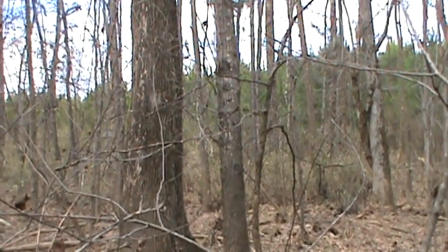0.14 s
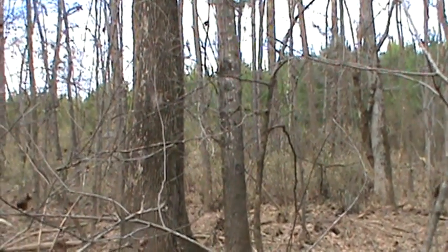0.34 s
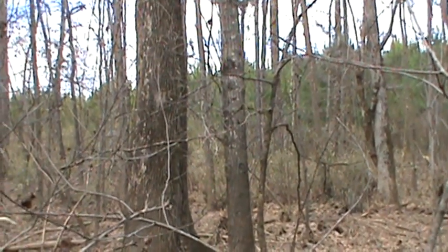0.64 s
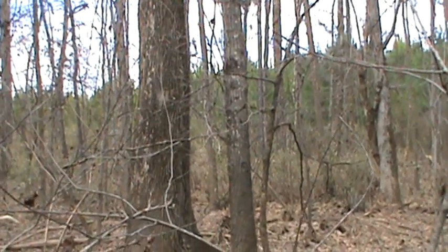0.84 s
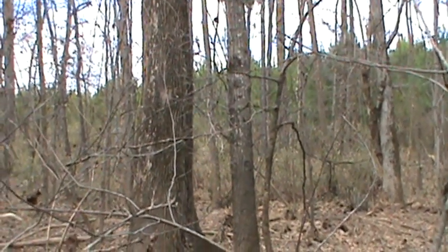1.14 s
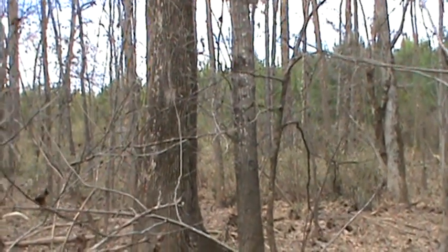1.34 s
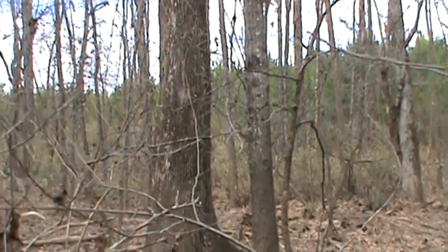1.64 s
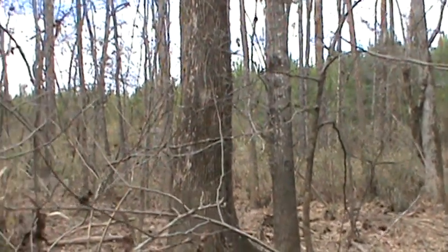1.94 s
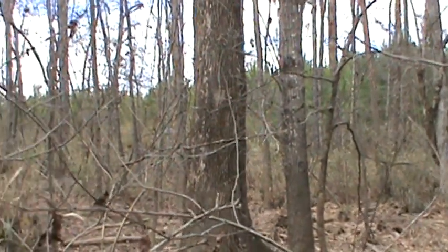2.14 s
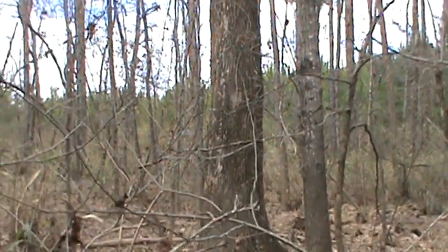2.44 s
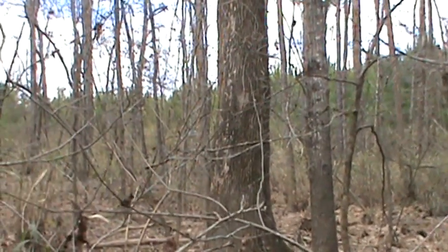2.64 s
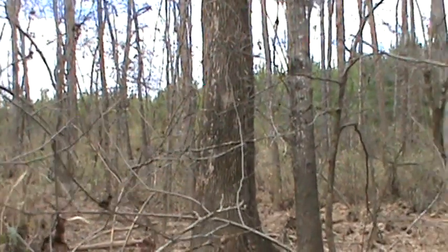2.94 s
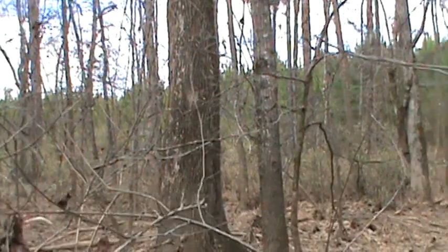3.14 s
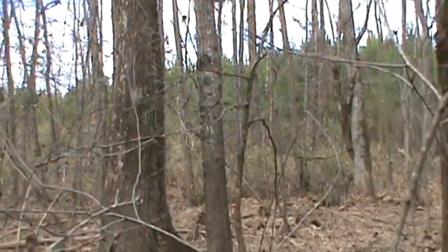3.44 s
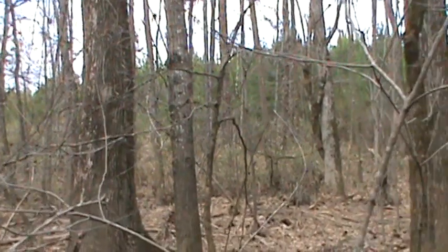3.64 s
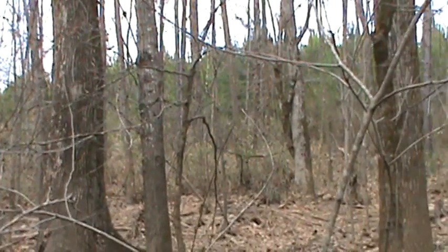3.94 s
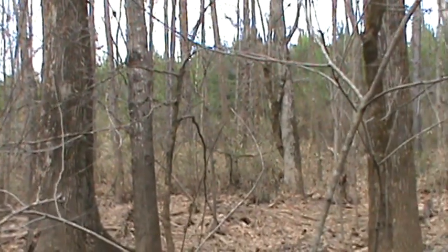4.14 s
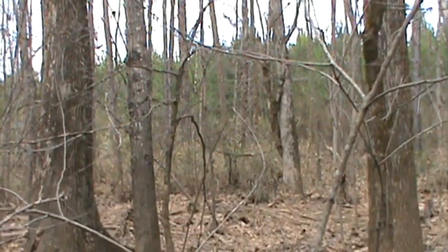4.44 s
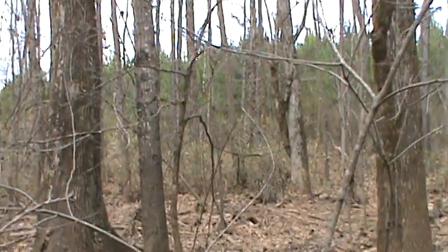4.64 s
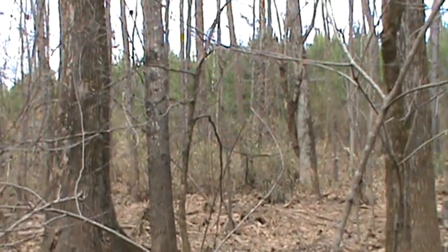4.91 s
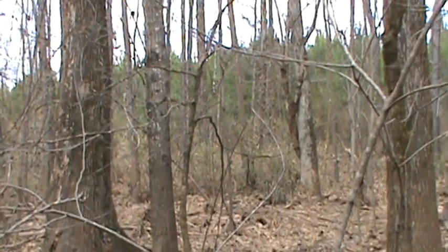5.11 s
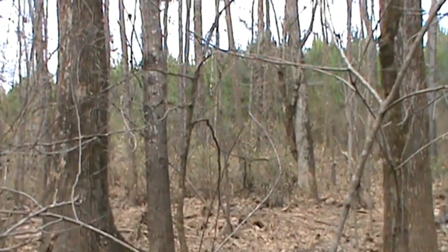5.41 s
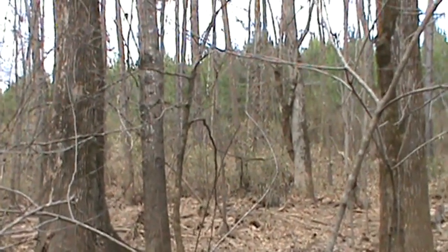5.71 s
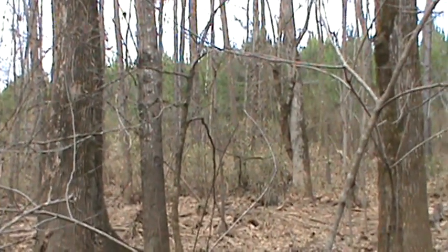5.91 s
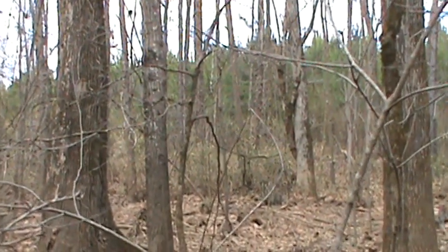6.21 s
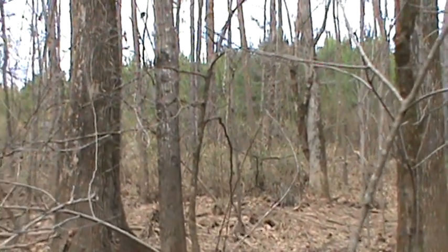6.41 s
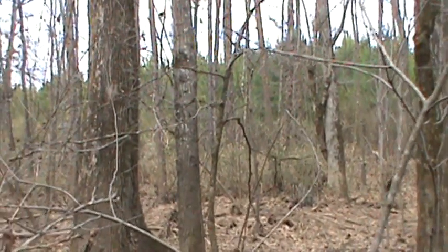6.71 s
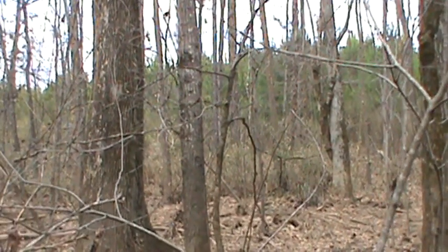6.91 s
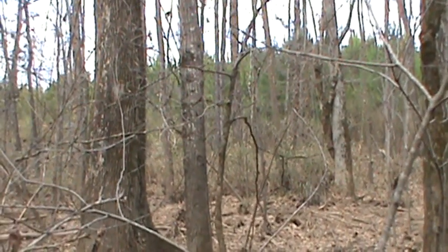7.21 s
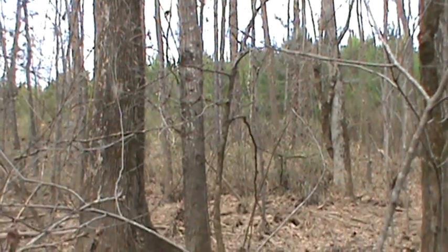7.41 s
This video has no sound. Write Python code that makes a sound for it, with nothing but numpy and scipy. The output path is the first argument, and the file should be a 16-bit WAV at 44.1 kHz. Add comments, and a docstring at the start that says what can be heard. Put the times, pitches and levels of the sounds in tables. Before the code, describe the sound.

Distant hounds yelp and bay together, thick at first and then sparser, ringing through open woods with rare thin bird chips and tiny handling ticks.

```python
"""You hear a pack of hounds baying some way off in bare woodland, thin bird chips, hiss, hum and ticks.
Each bay is a stack of tones on a pitch that scoops up, with a rasp of air; the trunks scatter it into a long tail.
The bird's chips are short gliding tones. Filtered noise makes the hiss and rumble of air and electronics.
The hand-held camcorder adds a wavering motor hum, thin whines and its line whistle, all from sine waves,
and a few ticks from the hand, made of tiny noise bursts."""
import sys
import numpy as np
from scipy import signal
from scipy.fft import rfft, irfft
from scipy.io import wavfile
from scipy.ndimage import uniform_filter1d

SR = 44100
rng = np.random.default_rng(int(sys.argv[2]) if len(sys.argv) > 2 else 0)


def store_wav(level_fs):
    """Save 16-bit WAV to argv[1]."""
    pcm = np.round(np.clip(np.atleast_2d(level_fs), -1, 1) * 32767)
    wavfile.write(sys.argv[1], SR, pcm.T.astype(np.int16))


N = 333396

# The cries of the pack. Each row: start in seconds, scoop in seconds, hold in seconds, top pitch in Hz,
# end pitch in Hz, then levels in dB of the first, second, third and fourth partial and of the treble partials,
# roughness from 0 to 1, and how far the hound faces the microphone in dB (for the straight sound only).
CRIES = [(-.3, 0.039, 0.068, 652.7, 654, -21, -39, -36, -50, -85, 0.38, 0),
         (-.12, .045, 0.098, 545.6, 533, -54, -41, -40, -48, -85, 0.49, -4),
         (0, 0.015, 0.1026, 694, 613.4, -29.5, -41.5, -58, -59, -68, 0.26, -4),
         (.2, 0.036, .15, 714.5, 679, -34, -39.5, -47, -50, -82, 0.19, -5.5),
         (.28, .02, .1, 659.6, 663, -34.5, -34.5, -40, -44, -72, 0.17, -4.5),
         (.36, 0.0267, 0.083, 465, 407, -61, -47.5, -33, -46, -71, 0.26, -8),
         (.45, .05, 0.062, 678, 710.6, -33.5, -41, -44, -68, -71, 0.18, -5),
         (.58, .013, 0.17, 644.3, 690, -36.5, -42, -46.5, -45, -74.5, 0.24, -9.5),
         (.68, 0.0637, 0.072, 647, 641.3, -26, -36, -39, -44, -69, 0.2, -3),
         (.75, 0.0091, 0.12, 633.1, 640, -29, -35.5, -48.5, -50, -74, 0.16, -9.5),
         (.78, 0.039, 0.022, 479, 478, -50.5, -31.5, -58, -47, -71, 0.11, -3.5),
         (.97, 0.046, .06, 611, 628, -33, -34, -42.5, -44.5, -73, 0.12, -3),
         (1.03, 0.034, 0.069, 691, 710, -33, -42, -53, -52, -68.5, 0.28, -12),
         (1.17, .048, 0.031, 682.2, 715, -31.5, -60, -56, -70, -88, 0.3, -1),
         (1.3, 0.043, 0.041, 530, 534, -44.5, -38, -46, -54, -85, 0.13, -4.5),
         (1.36, .015, 0.034, 467, 424, -58, -40.5, -48, -66, -87, 0.1, -3),
         (1.38, 0.0387, 0.08, 646, 600, -31, -36, -52, -47, -83, 0, -5),
         (1.43, 0.044, 0.03, 609.3, 614, -35.5, -37, -41.5, -48, -74, 0.21, -0.9),
         (1.48, 0.03185, 0.043, 699, 704, -38.5, -43, -48, -62, -76, 0.16, -1),
         (1.57, 0.034, 0.083, 626, 623, -36, -37.5, -40.5, -42.5, -72.5, .12, -4),
         (1.63, 0.037, 0.027, 707.5, 746, -34, -57, -65, -69.5, -84, 0.09, 0),
         (1.77, 0.016, 0.12, 629.4, 619, -34.5, -42.5, -52, -51, -80, .11, -3.5),
         (1.86, 0.042, 0.0498, 555, 543.8, -48, -41, -45, -49, -81, 0.12, -0.5),
         (1.91, 0.011, 0.14, 621.2, 622, -35.5, -64.5, -64, -71, -87, 0.23, .6),
         (1.95, .035, 0.055, 472, 470, -66, -42.5, -58, -59, -87.5, 0.28, -1.5),
         (2.0, 0.018, 0.0404, 544, 535, -63, -35, -51, -63.5, -85, 0.13, -1),
         (2.13, .053, 0.033, 701.5, 696, -32, -31.5, -41.5, -51.5, -72.5, 0.08, 1),
         (2.2, 0.034, 0.072, 528, 542, -76.5, -40, -62, -64, -74, .14, -2.5),
         (2.23, 0.015, 0.089, 684.6, 634.5, -35, -40.5, -58, -62, -79, 0.15, 1),
         (2.28, 0.0095, 0.083, 654, 646, -37, -41.5, -70, -46, -72, 0.15, -4.5),
         (2.41, 0.036, 0.077, 597, 604.2, -44, -38.5, -49, -46.5, -72.5, 0.22, -4.5),
         (2.46, 0.012, 0.056, 668, 613, -23, -46, -48, -62, -73, 0.18, -9),
         (2.54, 0.036, 0.042, 620.4, 636, -37, -34, -41.5, -48, -71, 0.23, -2),
         (2.6, 0.011, 0.059, 470.6, 460, -70, -46, -51.5, -55.5, -76, .45, -7),
         (2.65, .015, 0.11, 633, 624, -38, -37.5, -47, -48, -76, 0.16, -1),
         (2.84, 0.059, .05, 617, 605, -38.5, -40.5, -39.5, -48.5, -71, .09, 1.5),
         (2.92, 0.012, 0.12, 695.6, 658, -38, -41.5, -53, -78, -61.5, 0.14, -2.5),
         (2.97, .035, 0.089, 627, 618, -32, -43, -60, -51, -70, 0.26, -1.2),
         (2.98, 0.0286, 0.0583, 579.4, 638, -36, -43, -41.5, -45, -72, 0.4, -4),
         (3.03, 0.022, 0.043, 474.6, 461, -80, -39, -46.5, -62, -71, 0.2, -2),
         (3.1, 0.015, 0.054, 653, 590, -39, -47, -65, -75, -81, 0.31, -.6),
         (3.27, 0.061, 0.058, 649.7, 612, -29.5, -42, -50.5, -49.5, -73, 0.19, -3.5),
         (3.46, 0.042, 0.044, 574.3, 590, -47.5, -35.5, -43.5, -49.5, -72, 0.08, -0.7),
         (3.52, .013, 0.034, 455, 437, -74, -36, -47, -54, -70, 0.27, -3),
         (3.55, 0.037, 0.038, 627, 584, -31.5, -49, -64, -61, -78, 0.14, -0.5),
         (3.57, .041, 0.019, 543, 534.5, -74, -38, -47, -65, -73.5, 0.1, 2),
         (3.72, 0.089, 0.089, 705.6, 637.5, -33.5, -36.5, -39.5, -46, -77, .15, 0),
         (3.9, .055, 0.073, 628, 630, -45, -51.5, -50.5, -57.5, -83, 0.35, .3),
         (3.94, .044, 0.033, 677.8, 686, -29.5, -42.5, -65, -53, -72, 0.18, -2.5),
         (4.25, 0.072, 0.042, 741, 714, -31, -37.5, -47.5, -58, -76, 0.09, -0.5),
         (4.36, 0.016, .054, 607, 622, -49, -44.5, -51, -72, -73, 0.29, -1.5),
         (4.36, 0.011, 0.062, 720.6, 741, -28.5, -34.5, -56, -62, -80, 0.06, -1.5),
         (4.87, 0.074, 0.068, 689.8, 699, -35.5, -44, -60, -60, -72, 0.16, -2),
         (4.88, 0.037, 0.013, 646.6, 685, -32.5, -42.5, -54, -50, -84, 0.02, -1),
         (5.02, .015, 0.099, 665.5, 654, -35, -74, -80, -71, -87, 0.08, -5),
         (5.25, .055, 0.055, 665.2, 664, -33, -35.5, -50.5, -53.5, -86.5, 0.05, -3),
         (5.41, 0.02116, .062, 756, 496, -41, -51, -47, -56, -84, 0.08, -1),
         (5.46, .02, 0.033, 633, 683, -39, -43.5, -48, -56, -78.5, 0.16, 0),
         (5.51, 0.0257, 0.019, 474, 470, -74, -39, -54, -44, -80, 0.37, -3.5),
         (5.56, 0.031, 0.0912, 420, 393.5, -77, -76, -41.5, -44.5, -73, 0.36, -2),
         (5.505, 0.08, 0.0539, 702.4, 647, -34.5, -45, -40.5, -47, -70, 0.24, -1.7),
         (5.62, 0.048, 0.11, 639, 635, -32.5, -42.5, -49, -51.5, -74, .2, -0.5),
         (6.235, 0.071, .058, 657.2, 624.5, -44, -41.5, -42.5, -43.5, -75, 0.1, .6),
         (6.33, 0.013, .078, 686, 622, -34, -45.5, -64, -66, -90, 0.18, -3.5),
         (6.36, 0.0245, 0.0178, 578, 590, -73, -41, -70, -69, -81, 0.06, 0),
         (6.7, 0.0426, 0.04, 662.7, 667, -33.5, -37.5, -41.5, -51.5, -87, 0.11, -3.5),
         (6.92, 0.045, 0.068, 596, 575, -47, -51, -55, -54.5, -78, 0.2, 0),
         (6.97, .059, .022, 685, 710, -35, -46, -72, -72, -75.5, 0.25, -5),
         (7.21, 0.058, 0.025, 653.4, 634, -31, -41.5, -48.5, -52.5, -83.5, 0.2, -6),
         (7.24, 0.044, 0.035, 609.1, 624, -42, -39.5, -50.5, -50.5, -76, 0.1, 0.5),
         (7.29, .055, .108, 704, 691, -44, -44, -50.5, -61.5, -70.5, 0.12, -2),
         (7.4, 0.015, 0.082, 619, 585, -41, -65, -63, -71, -83, 0.32, .6),
         (7.5, 0.067, .062, 638, 611, -48.5, -42.5, -48, -53, -81, 0.08, -1)]
# Ticks of the casing. Each row: start in seconds, peak level in dB, lower edge of the sound in Hz (roughly).
CASING_TICKS = [(0.0693, -49, 4020), (5.4954, -43, 6300), (6.1527, -40.5, 8800), (6.2307, -40, 5010),
                (6.2464, -44, 8070)]
# Tone colour of the hiss and rumble. Each row: frequency in Hz, relative level in dB per Hz.
HISS_SPECTRUM = [(20, -12), (30, -4), (50, -1), (120, 0), (200, -6), (450, -9), (2000, -14.5), (6000, -18),
                 (11000, -19.5), (15500, -20.5)]
# Stereo width of the hiss. Each row: frequency in Hz, side level minus mid level in dB.
HISS_WIDTH = [(30, -19.5), (70, -19), (120, -11.5), (250, 0), (1000, -0.5), (4400, -4.5), (8000, -4.5),
              (15000, -10.5)]
# Loudness of the motor hum over time. Each row: time in seconds, level in dB.
HUM_LEVELS = [(0.0, -60), (0.27, -64.5), (1.37, -56.5), (1.54, -74), (1.81, -60), (3.39, -67), (6.15, -58),
              (6.23, -62.5), (7.56, -63)]
# Faint thin tones of the camcorder. Each row: frequency in Hz, level in dB.
THIN_WHINES = [(6971, -82), (9421, -84), (10160, -88)]
# A small bird's chips. Each row: start in seconds, length in seconds, start pitch in Hz, end pitch in Hz, level in dB.
BIRD_CHIPS = [(0.21, .09, 7500, 7350, -61), (1.612, 0.035, 7170, 7900, -57),
              (2.964, .032, 8280, 7320, -61.5), (4.337, 0.034, 7440, 7900, -58)]

# The voice
SCOOP_PER_S = 3.4  # share of the top pitch that a scoop climbs in a second
THROAT_SLOPE_DB = 21.5  # per octave: the fundamental fades below the throat resonance
SECOND_SLOPE_DB = 40  # per octave: the second partial blooms as the mouth opens
CLOSING_DB = -15.5  # partials from the third up sink while the mouth closes over the hold
SWELL_DB = -9  # a cry starts this far under its peak and swells while it scoops
MOUTH_DB = -12  # level of the partials between the fourth and the treble, under the fourth
MOUTH_EDGE_HZ, TREBLE_HZ, TREBLE_TOP_HZ = 3170, 3630, 7926
RASP_DB, RASP_LOW_HZ, RASP_HIGH_HZ = -17.5, 830, 2890  # level is under the second partial

# The wood; T60 is the time to fade by 60 dB
WOOD_T60_S, WOOD_TREBLE_T60_S, WOOD_SPLIT_HZ, WOOD_BUILD_S = 1.865, 1, 2160, 0.0027
DIRECT_DB, SCATTER_DB, SCATTER_TREBLE_DB = 5, -.5, 1.5
SCATTER_SIDE_DB, SCATTER_SIDE_HZ = -2.5, 1710
PACK_PAN_DB, SCATTER_PAN_DB = 3.3, 1.5  # left louder than right: the pack stands to the left
STIR, STIR_HZ = 0.7, 40  # moving air and twigs make the scattered sound shimmer
GROUND_HZ = 444  # the ground echo cancels what lies below
LEAD_S = .4  # time before the start, for cries already under way

# The camcorder
FLOOR_DB = -53.5  # hiss and rumble
HUM_HZ, HUM_THIRD_DB, HUM_WAVER = 80.6, -10.5, 0.00762  # waver is a share of the pitch
LINE_HZ, LINE_DB = 15734.3, -70.5
FIELD_HZ, FIELD_BUZZ = 59.94, .3  # the whistle drops by this share once a picture field
TOP_HZ = 15790  # upper limit of the sound


def undb(db):
    """Turn a level in dB into a gain."""
    return 10 ** (np.asarray(db) / 20)


def unit(x):
    """Scale to an average (rms) strength of 1."""
    return x / np.sqrt(np.mean(x ** 2))


def band(x, lo_hz, hi_hz, order=2):
    """Keep mainly the frequencies between two edges (Butterworth band-pass)."""
    sos = signal.butter(order, [lo_hz, hi_hz], "band", fs=SR, output="sos")
    return signal.sosfilt(sos, x)


def highpass(x, hz, order):
    """Weaken what lies below an edge (Butterworth high-pass)."""
    return signal.sosfilt(signal.butter(order, hz, "high", fs=SR, output="sos"), x)


def wander(size, hz):
    """Smooth random drift of rms 1 that turns about hz times a second."""
    width = max(int(SR / hz / 1.525), 1)
    x = rng.standard_normal(size + 4 * width)
    for _ in range(4):
        x = uniform_filter1d(x, width)
    return unit(x[2 * width:-2 * width])


def shaped(points):
    """Gain at each frequency of a spectrum, joined up between (Hz, dB) points."""
    point_hz, point_db = np.transpose(points)
    hz = np.maximum(np.arange(N // 2 + 1) * SR / N, 1)
    return undb(np.interp(np.log(hz), np.log(point_hz), point_db))


def left_right(pan_db):
    """Gains of the two channels, left louder than right by pan_db."""
    return undb(np.array([[.5], [-.5]]) * pan_db)


def bay(scoop, hold, start_hz, top_hz, end_hz, first_db, second_db, third_db, fourth_db,
        mouth_db, treble_db, rasp_db, rough):
    """One cry: a stack of partials on a pitch that scoops up and glides to its end, with a rasp of air."""
    scoop, hold, rough = max(scoop, .012), max(hold, .015), np.clip(rough, 0, 1)
    t = np.arange(int((scoop + hold) * SR)) / SR
    before = np.clip(1 - t / scoop, 0, 1)  # falls from 1 to 0 over the scoop
    after = np.clip((t - scoop) / hold, 0, 1)  # rises from 0 to 1 over the hold
    hz = top_hz + (start_hz - top_hz) * before ** 2 + (end_hz - top_hz) * after ** 2
    octaves_under = np.log2(np.minimum(hz / top_hz, 1))  # zero or negative
    rough = rough * (.5 + 1.5 * after)  # the voice scoops cleanly and breaks up as it tires
    hz = hz * (1 + (0.0029 + 0.07 * rough) * wander(len(t), 183))  # unsteady folds jitter the pitch
    phase = 2 * np.pi * np.cumsum(hz) / SR

    upper = undb(third_db) * np.sin(3 * phase) + undb(fourth_db) * np.sin(4 * phase + 1)
    edges_hz = [MOUTH_EDGE_HZ, TREBLE_HZ, TREBLE_TOP_HZ, TREBLE_TOP_HZ + 800]
    edges_db = [mouth_db, treble_db, treble_db, treble_db - 40]
    for k in range(5, 16):
        db = np.interp(k * hz, edges_hz, edges_db)
        flicker_db = 1.8 * (k - 4) ** 0.23 * wander(len(t), 38)  # the higher the partial, the more broken
        upper += undb(db + flicker_db) * np.sin(k * phase + k * k)
    second = undb(second_db + SECOND_SLOPE_DB * octaves_under) * np.sin(2 * phase)
    overtones = second + undb(CLOSING_DB * after) * upper
    # hoarse cries alternate strong and weak cycles (lines halfway between partials) and flutter
    overtones *= 1 + 2.4 * rough * np.sin(phase / 2) + 3.34 * rough * wander(len(t), 357)
    first = undb(first_db + THROAT_SLOPE_DB * octaves_under) * np.sin(phase)
    first *= 1 + 1.25 * rough * wander(len(t), 106.6)

    puffs = rng.standard_normal(len(t)) * (1 + np.sin(phase))  # air hisses once a cycle
    rasp = undb(rasp_db) * unit(band(puffs, RASP_LOW_HZ, RASP_HIGH_HZ, order=4))
    rasp *= 0.6 + 1.7 * after
    onset = np.minimum(t / (0.25 * scoop), 1)
    fade = np.cos(after * np.pi / 2) ** 0.79
    effort = onset * undb(SWELL_DB * before) * fade
    return (np.sqrt(2) * (first + overtones) + rasp) * effort


def cry(scoop, hold, top_hz, end_hz, first_db, second_db, third_db, fourth_db, treble_db, rough):
    """A bay from its row: longer scoops start lower; further partials and rasp follow the lower ones."""
    start_hz = top_hz * (1 - SCOOP_PER_S * scoop)
    mouth_db, rasp_db = fourth_db + MOUTH_DB, second_db + RASP_DB
    return bay(scoop, hold, start_hz, top_hz, end_hz, first_db, second_db, third_db, fourth_db,
               mouth_db, treble_db, rasp_db, rough)


def trunks():
    """Stereo scatter of the wood from one spot: dense, building up quickly, treble dying first."""
    t = np.arange(int(1.6 * SR)) / SR
    low, high = rng.standard_normal((2, 2, len(t)))
    split = signal.butter(1, WOOD_SPLIT_HZ, fs=SR, output="sos")
    tail = signal.sosfilt(split, low) * undb(-60 * t / WOOD_T60_S)
    treble = high - signal.sosfilt(split, high)
    tail += treble * undb(SCATTER_TREBLE_DB - 60 * t / WOOD_TREBLE_T60_S)
    build = 1 - np.exp(-t / WOOD_BUILD_S)
    mid, side = tail * build * undb(SCATTER_DB) / np.sqrt(.08 * SR)
    # close microphones differ only at short wavelengths
    side = undb(SCATTER_SIDE_DB) * highpass(side, SCATTER_SIDE_HZ, order=1)
    return np.array([mid + side, mid - side]) * left_right(SCATTER_PAN_DB)


def pack(count=6):
    """Every cry arrives straight and again off the trunks; the hounds stand at a few spots."""
    lead = int(LEAD_S * SR)
    direct = np.zeros(N + lead + SR)
    spots = np.zeros((count, N + lead + SR))
    for k, (start, *voice, facing_db) in enumerate(CRIES):
        call = cry(*voice)
        i = int(start * SR) + lead
        direct[i:i + len(call)] += undb(facing_db) * call
        shimmer = 1 + STIR * wander(len(call), STIR_HZ)
        spots[k % count, i:i + len(call)] += call * shimmer
    scatter = sum(signal.fftconvolve(spot[None], trunks(), axes=1) for spot in spots)
    straight = undb(DIRECT_DB) * left_right(PACK_PAN_DB) * direct[:lead + N]
    heard = straight + scatter[:, :lead + N]
    return highpass(heard, GROUND_HZ, order=4)[:, lead:]


def hiss():
    """Steady hiss and rumble of air and electronics: noise coloured by frequency, in stereo."""
    mid, side = rfft(rng.standard_normal((2, N))) * shaped(HISS_SPECTRUM)
    mid, side = irfft(mid, N), irfft(side * shaped(HISS_WIDTH), N)
    return undb(FLOOR_DB) * np.array([mid + side, mid - side]) / np.std(mid)


def camcorder():
    """Motor hum with its third partial, thin whines and the line whistle, buzzed once a picture field."""
    t = np.arange(N) / SR
    motor_hz = HUM_HZ * (1 + HUM_WAVER * wander(N, 6.75))
    turn = 2 * np.pi * np.cumsum(motor_hz) / SR
    hum = np.sin(turn) + undb(HUM_THIRD_DB) * np.sin(3 * turn)
    hum *= undb(np.interp(t, *np.transpose(HUM_LEVELS)))
    whines = np.zeros(N)
    for hz, db in THIN_WHINES:
        drifting_hz = hz + 9 * wander(N, 8.06)
        whines += undb(db) * np.sin(2 * np.pi * np.cumsum(drifting_hz) / SR)
    blanking = (t * FIELD_HZ) % 1 < .08  # a short gap in each picture field
    whistle = undb(LINE_DB) * (1 - FIELD_BUZZ * blanking) * np.sin(2 * np.pi * LINE_HZ * t)
    return np.sqrt(2) * (hum + whines + whistle)


def ticks():
    """Tiny dry ticks of the casing in the hand: noise bursts that die at once, each in a narrow band."""
    out, t = np.zeros(N), np.arange(300) / SR
    for start, peak_db, hz in CASING_TICKS:
        burst = rng.standard_normal(len(t)) * np.exp(-t / 0.00167)
        burst = band(burst, 1.05 * hz, min(1.165 * hz, 15500), order=1)
        i = int(start * SR)
        out[i:i + len(t)] += undb(peak_db) * burst / np.abs(burst).max()
    return out


def bird():
    """Thin chips of a small bird: single tones that glide in pitch, swelling and fading smoothly."""
    out = np.zeros(N)
    for start, length, start_hz, end_hz, db in BIRD_CHIPS:
        size, i = int(length * SR), int(start * SR)
        phase = 2 * np.pi * np.cumsum(np.linspace(start_hz, end_hz, size)) / SR
        swell = np.sqrt(2 * np.hanning(size))
        out[i:i + size] += undb(db) * swell * np.sin(phase)
    return out


def scene():
    """Pack, hiss, the camcorder's own sounds, ticks and bird together."""
    return pack() + hiss() + camcorder() + ticks() + bird()


def record(dry):
    """Cut the top steeply, just above the line whistle."""
    return signal.sosfilt(signal.ellip(12, .3, 70, TOP_HZ, fs=SR, output="sos"), dry)


dry = scene()
out = record(dry)
store_wav(out)
```